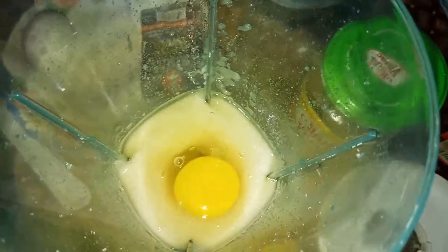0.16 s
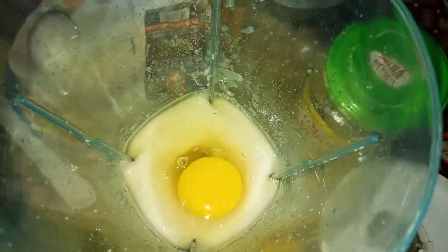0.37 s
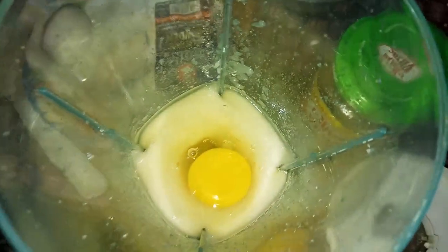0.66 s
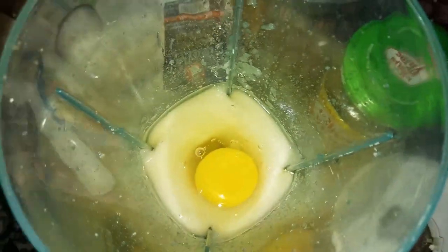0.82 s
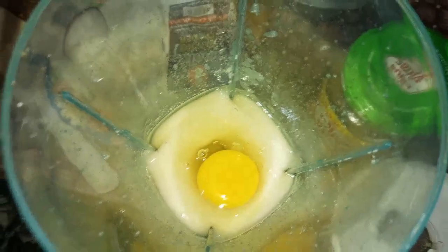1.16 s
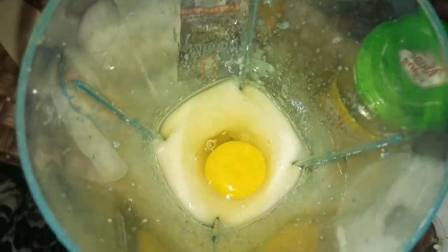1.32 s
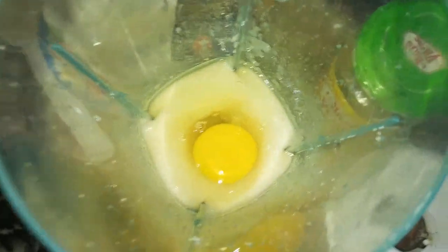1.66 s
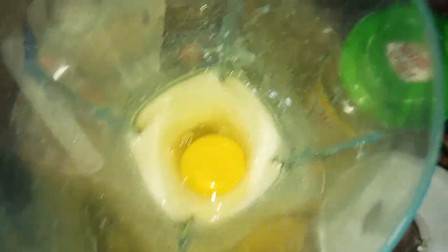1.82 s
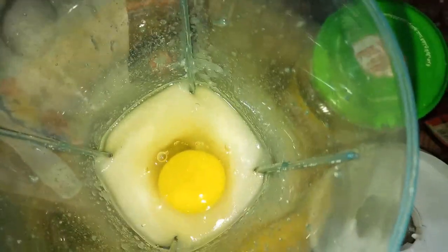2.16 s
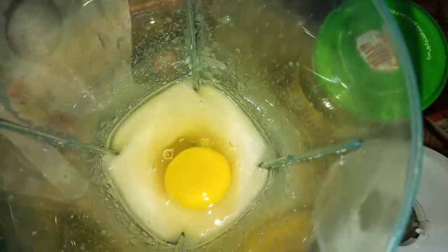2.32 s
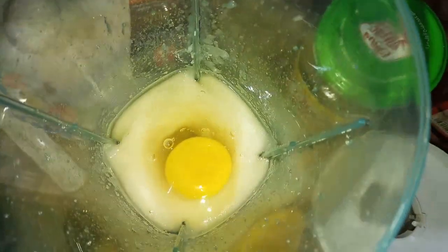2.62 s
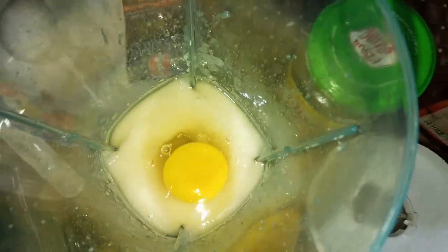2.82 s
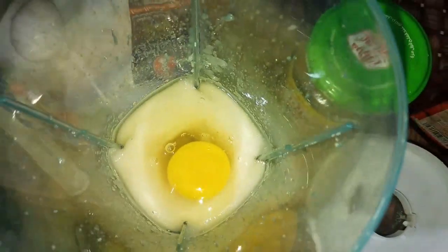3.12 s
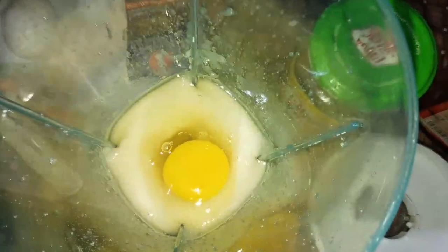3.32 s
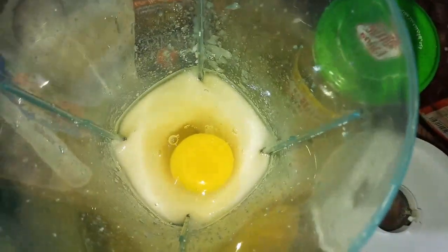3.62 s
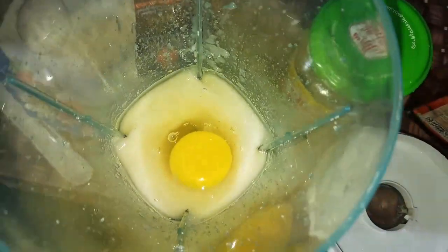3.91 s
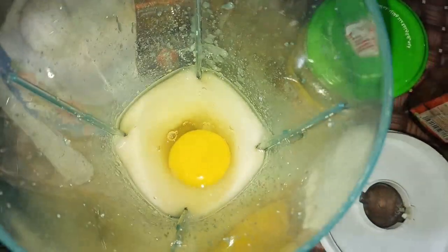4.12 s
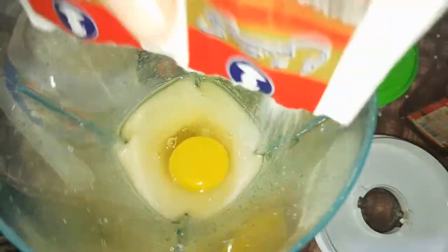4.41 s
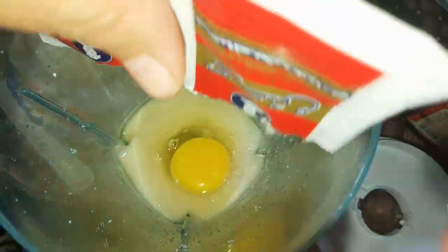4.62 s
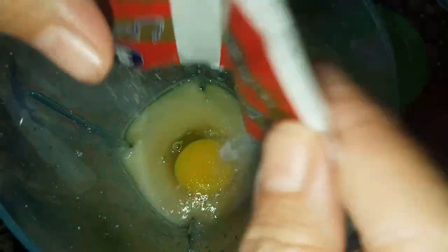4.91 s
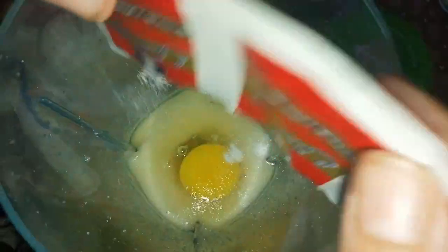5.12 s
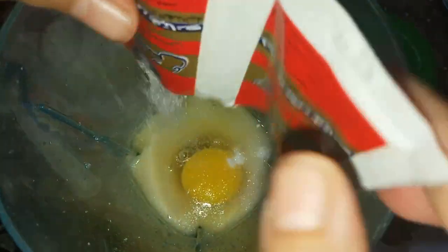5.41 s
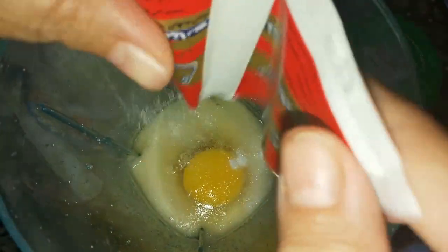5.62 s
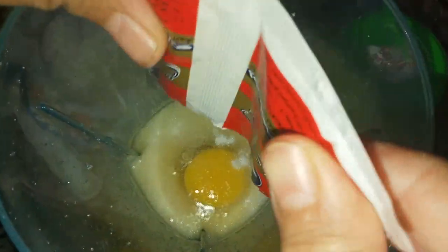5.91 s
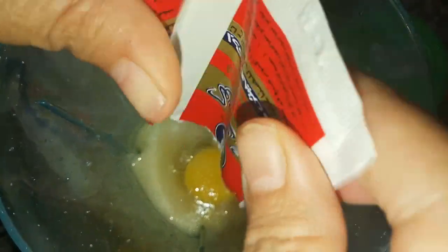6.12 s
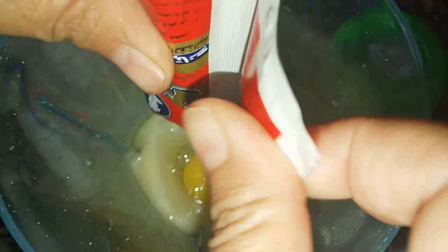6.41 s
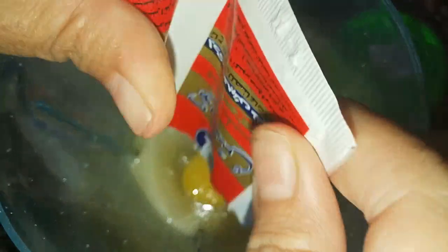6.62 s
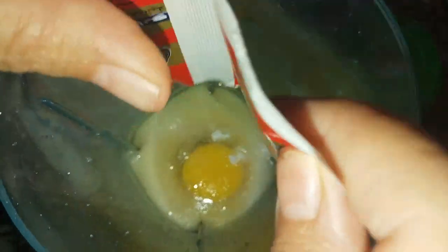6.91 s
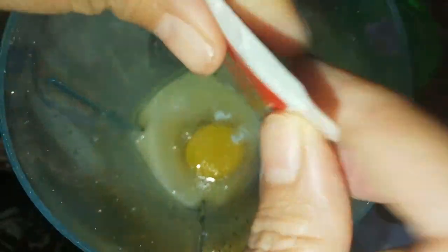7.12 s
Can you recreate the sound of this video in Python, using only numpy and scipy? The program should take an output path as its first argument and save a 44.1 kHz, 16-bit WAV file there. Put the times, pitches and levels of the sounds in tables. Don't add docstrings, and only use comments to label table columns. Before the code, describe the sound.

A small paper packet is torn and crinkled in sharp quick bursts, goes nearly quiet, then rustles densely over a bowl in a small kitchen.

```python
import sys
import numpy as np
from scipy import signal
from scipy.fft import rfft, irfft, next_fast_len
from scipy.io import wavfile
from scipy.ndimage import uniform_filter1d, map_coordinates

SR = 44100
rng = np.random.default_rng(int(sys.argv[2]) if len(sys.argv) > 2 else 0)


def file_out(sig):
    cols = np.atleast_2d(sig).T
    lim = np.clip(cols, -1, 1)
    pcm = np.round(lim * 32767).astype(np.int16)
    wavfile.write(sys.argv[1], SR, pcm)


def makeup_ratio(level_db):
    decades = np.asarray(level_db, float) / 20
    return 10 ** decades


N = 320166
T_S = np.arange(N) / SR

# (time [s], peak [dB], panel pitch [Hz], panel share [dB])
TEARING_CREASES = [(0.031, -17, 2650, -7), (0.105, -28, 2500, -17), (0.128, -19, 3360, -31),
                   (0.2776, -18.5, 3100, -5), (0.3319, -26.5, 1600, -1), (0.41, -45, 1900, 12),
                   (0.495, -22.5, 1920, -8), (0.537, -30, 1840, -3), (0.552, -35, 2120, -19),
                   (0.576, -26.5, 1850, 6), (0.735, -41.5, 2330, -5), (0.8076, -33, 2330, -12),
                   (0.893, -54.5, 2160, 16), (0.9299, -27.5, 1820, 0.5), (0.9749, -5.5, 3500, -22.5),
                   (1.0785, -22.5, 3330, -17), (1.126, -23, 2460, -11), (1.1562, -26, 2510, -6),
                   (1.3047, -43.5, 1650, -10), (1.6648, -41.5, 3070, -28), (1.7844, -36, 2380, -11),
                   (1.7949, -18, 3360, -44), (1.951, -28, 3400, -34), (1.972, -23, 2500, -13),
                   (2.0351, -22, 3120, -23.5), (2.0996, -25, 2760, -23), (2.1237, -31, 2860, -5.5),
                   (2.241, -28, 2880, -32), (2.4689, -24, 3230, -37), (1.927, -36, 1560, -23)]
# (time [s], peak [dB], panel pitch [Hz], panel share [dB])
HOLDING_CREASES = [(2.7515, -43.5, 2950, -3.5), (2.791, -39.5, 2650, -26), (2.8266, -42.5, 3350, -24),
                   (2.878, -62, 1550, 11), (2.929, -51, 2060, -7), (2.9414, -56, 3050, 15.5),
                   (3.128, -65, 2700, 10), (3.1695, -50, 2600, -19), (3.1873, -50, 2500, -25),
                   (3.3063, -50, 1730, -15), (3.6243, -48.5, 3400, -4), (3.8847, -52, 2500, 7.5),
                   (3.955, -55.5, 2000, 3), (4.028, -61, 1680, 15.5), (4.045, -61, 1870, 15.5),
                   (4.06, -70, 1590, 12), (4.092, -63, 1690, 21.5), (4.105, -65.5, 1620, 18.5),
                   (4.379, -36.5, 2720, -6), (4.42, -51, 2300, -2), (4.459, -25, 3300, -11),
                   (4.479, -32, 2140, -16), (2.7, -57, 3000, -36)]
# (time [s], peak [dB], panel pitch [Hz], panel share [dB])
SHAKING_CREASES = [(4.7198, -14, 2930, -4.5), (4.7452, -27, 3140, -13), (4.9264, -29.5, 2020, -15),
                   (4.9707, -32.5, 2830, 5), (5.0652, -30.5, 3200, -13), (5.1733, -21, 1990, -12.5),
                   (5.2299, -17.5, 2520, -3.5), (5.3193, -20, 2630, -8.5), (5.3745, -21, 1900, -8.5),
                   (5.403, -18, 2040, -7.5), (5.4288, -18.5, 1990, -6), (5.484, -28, 2645, -1.5),
                   (5.4992, -23.5, 2800, 2.5), (5.5605, -7, 3250, -9), (5.5764, -41, 3430, -1),
                   (5.6217, -21.5, 1800, -5), (5.6331, -13, 1960, -38), (5.678, -19, 1720, -10),
                   (5.7375, -20.5, 3400, -6), (5.756, -20, 2500, -3.5), (5.794, -19, 2960, -7),
                   (5.8102, -15, 3600, -4), (5.844, -22, 3150, -16), (5.865, -24.5, 2510, -18),
                   (5.8857, -10, 2980, -8.5), (5.969, -39, 2530, 3)]
# (time [s], peak [dB], panel pitch [Hz], panel share [dB])
SQUEEZING_CREASES = [(6.0167, -17.5, 2950, -29), (6.0375, -9.5, 2440, -28), (6.0446, -16.5, 1970, -5.5),
                     (6.054, -27, 2025, -29), (6.0696, -28, 3010, -1), (6.0786, -5, 3340, -13),
                     (6.1142, -12, 1750, -4.5), (6.1628, -11.5, 2170, -4.5), (6.216, -12.5, 3160, -10),
                     (6.24, -21, 2500, -9), (6.306, -15, 2550, -6), (6.325, -24, 2500, -7),
                     (6.3465, -19, 1580, -11), (6.3967, -23.5, 1920, -11), (6.468, -23.5, 3000, 2),
                     (6.477, -9.5, 3450, -9), (6.4873, -4, 3530, -8.5), (6.4975, -8, 3350, -42),
                     (6.634, -28, 3250, -10.5), (6.6767, -19.5, 3250, -9), (6.7157, -12, 1970, -11),
                     (6.761, -13.5, 3280, -13), (6.774, -10.5, 2840, -32), (6.837, -26.5, 2060, -2),
                     (6.842, -19.5, 2050, -18), (7.0495, -16, 3340, -18), (7.058, -17, 3300, -14),
                     (7.067, -13, 3430, 1), (7.104, -35, 2100, -18), (7.115, -29.5, 1560, -4.5),
                     (7.2356, -25, 3530, -2)]
# (time [s], level [dB])
AIR_PUFFS = [(.16, -38), (0.5762, -32.5), (0.9747, -49), (4.7455, -43.5), (4.9706, -46.5), (5.0614, -43),
             (5.174, -35.5), (5.2311, -34), (5.4018, -36.5), (5.4974, -29.5), (5.561, -49), (5.795, -42),
             (5.87, -37), (6.035, -29.5), (6.0794, -44), (6.14, -49), (6.218, -35), (6.5, -45),
             (6.7146, -55), (6.85, -29), (7.036, -28), (7.0491, -51), (7.063, -30), (7.105, -41.5)]
# (time [s], peak [dB], panel share [dB])
FIBRE_TICKS = [(0.1305, -13, -20), (0.1803, -19, -15.5), (0.2321, -32, -24), (0.3938, -39, -10),
               (0.4319, -41, -1), (0.5534, -24, -25), (0.581, -23.5, 1.5), (0.8604, -50, -22.5),
               (1.1267, -29.5, -5), (1.158, -23, -28), (1.4185, -15.5, -6), (1.6663, -43.5, -32),
               (1.7983, -26, -27), (1.9258, -33.5, -29), (1.9501, -30, -16), (1.9869, -28, -12.5),
               (2.0359, -17, -28), (2.0811, -30, -31), (2.0991, -33, -26), (2.1111, -26.5, -28),
               (2.1238, -27, -20), (2.1358, -30, -26), (2.1403, -29.5, -12), (2.1683, -37, -10),
               (2.2235, -33, -26), (2.2435, -35, -27), (2.3948, -21, -37), (2.4307, -16, -15.5),
               (2.5312, -34, -25), (2.6501, -56, -22), (2.702, -53, -22), (2.7668, -38.5, -11),
               (2.7929, -41, -23), (2.8286, -45, -17), (2.8432, -41, -12), (2.9344, -46, -11),
               (2.9439, -41.5, -14), (2.9675, -58, 2), (2.9809, -57, 5), (3.1292, -55, 2),
               (3.192, -44.5, -16.5), (3.1955, -41, -26), (3.2276, -47, -19), (3.2793, -52, -8),
               (3.3661, -55, -14), (3.6233, -49.5, -12.5), (3.8883, -50.5, -4), (3.9072, -52, -7),
               (3.9173, -59, -1), (4.0298, -59, -10), (4.0585, -61, -4), (4.0695, -61, 0),
               (4.3375, -25, -34), (4.3662, -28, -30), (4.4144, -39, -16),
               (4.5117, -33, -28), (4.576, -50, -24), (4.7201, -11.5, -19), (4.7457, -22, -16.5),
                  (4.755, -27, -9), (4.773, -39, -12), (4.8339, -32.5, -23), (4.9296, -25.5, -18),
                  (4.9736, -28, 0), (5.001, -38, -18), (5.0587, -37, -11), (5.0859, -26, -18),
                  (5.0998, -30, -22), (5.17, -24.5, -4.5), (5.1813, -26, 2), (5.1998, -31, -27),
                  (5.2584, -26.5, -5.5), (5.3203, -36, -15), (5.3575, -31.5, -9.5), (5.3781, -23, -6),
                  (5.4043, -18.5, -6), (5.4989, -19.5, -6.5), (5.563, -18.5, -26), (5.637, -6, -25),
                  (5.6755, -11.5, -13.5), (5.6794, -24, -19.5), (5.6855, -24, -19), (5.6941, -32, -25),
                  (5.7907, -20.5, -6), (5.8015, -21.5, -20.5), (5.8103, -14, -17), (5.871, -27, -21),
                  (5.8814, -22, -21), (6.0435, -19.5, -13), (6.0504, -11.5, -17), (6.0676, -22, -8),
                  (6.1665, -12, -22), (6.182, -17, -2.5), (6.2082, -16.5, -21), (6.2112, -10.5, -9),
                  (6.2396, -21, -23), (6.3067, -22, -19), (6.327, -22, -13.5), (6.3435, -24, -6.5),
                  (6.3472, -5.5, -22), (6.3569, -26, -30), (6.378, -26, -15), (6.4175, -27.5, 0.5),
                  (6.7062, -27, -8.5), (6.7277, -19, -13), (6.738, -24, -22), (6.7617, -8, -18),
                  (6.7772, -24.5, -20), (6.7843, -25, -18), (6.8198, -25, -28), (6.8445, -4.5, -14.5),
                  (7.0501, -12, -18), (7.1116, -25, -8), (7.226, -44, -16), (7.2365, -25.5, -4.5),
               (.0144, -37, -15), (.108, -22.5, -18), (.155, -16.5, -12), (0.263, -35, -12),
              (.4785, -23, -27), (0.97, -15.5, -10.5), (.98, -13, -17), (1.868, -36, -11.5),
              (2.026, -38, -14), (2.046, -25.5, -26), (5.5598, -22, -6.5), (5.576, -25, -15.5),
              (5.6205, -26, -3), (5.89, -18, -17), (6.0344, -13, -8.5), (6.082, -11, -15), (6.198, -24, -4),
              (6.221, -11, -17), (6.351, -21, -18), (6.722, -17, -9), (6.766, -17.5, -19), (7.044, -26, -8),
              (7.089, -23.5, -12), (7.102, -27.5, -10)]
# (peak time [s], peak [dB], swell [s], fade [s], sheet share [dB])
FREE_STROKES = [(.019, -34.5, 0.022, 0.14, -1), (.1, -35, 0.09, 0.17, -6.5), (0.139, -25, 0.021, 0.13, -9),
                (.32, -41.5, 0.18, 0.23, -6), (0.489, -45.5, 0.021, 0.46, -8),
                (0.604, -32, 0.17, 0.092, -6), (.82, -52.5, 0.2, 0.18, -7), (.9, -67, 0.013, .2, 20.5),
                (1.002, -30.5, 0.075, 0.12, -6.5), (1.25, -58.5, 0.49, 0.27, -5.5),
                (1.391, -23, 0.015, 0.17, -8), (1.432, -25, 0.043, 0.12, -5),
                (1.79, -39, 0.016, 0.29, -14.5), (1.97, -53, 0.32, 0.21, -11),
                (2.05, -35.5, 0.099, 0.29, -34.5), (2.14, -39.5, 0.15, 0.28, -20.5),
                (2.37, -44.5, 0.088, 0.12, -30), (2.402, -20.5, 0.028, .15, -31.5),
                (2.449, -28, 0.09, 0.096, -9.5), (2.77, -55.5, 0.055, 0.32, -9),
                (3.2, -67, 0.11, 0.37, -14), (4.05, -66.5, 0.51, 0.12, 3.5), (4.33, -38, 0.16, 1, -32),
                (4.46, -37.5, 0.46, 0.15, -25)]
# (peak time [s], peak [dB], swell [s], fade [s], sheet share [dB])
JAR_STROKES = [(4.729, -29.5, 0.035, 0.21, -12), (4.85, -40, 0.11, 0.28, -15.5),
               (4.93, -33, 0.061, 0.058, -15), (5.15, -37.5, 0.41, 0.76, -16), (5.4, -56, 0.62, 0.58, -13),
               (5.601, -36, 0.14, 0.39, -12), (5.8, -37.5, 0.17, 0.37, -4),
               (6.025, -29.5, 0.027, 0.44, -7.5), (6.217, -25, 0.081, 0.091, -6.5),
               (6.37, -41.5, 0.1, 0.25, -8.5), (6.507, -22, 0.058, 0.11, -10.5),
               (6.685, -44, 0.014, .12, -13), (6.726, -26.5, 0.053, 0.14, -9.5),
               (6.859, -38, 0.35, 0.11, -10), (7.059, -29, 0.049, 0.12, -9), (7.26, -53, 0.15, 0.17, 2.5)]
# (start [s], end [s])
SLIDE_S = (4.14, 4.71)
# (frequency [Hz], density [dB per Hz])
PAPER_COLOUR = [(1290, -37.5), (2200, -19.5), (3130, -9), (3390, -4), (3830, -5.5), (4190, -0.5), (6030, 4),
                (7670, -11.5), (8250, -26.5), (8390, -70.5), (10900, -74), (18500, -120)]
# (centre [Hz], width [Hz], level [dB])
PANEL_MODES = [(1578, 320, 0), (1962, 192, 7), (2500, 650, 3.5), (980, 1130, -5.5)]
# (centre [Hz], width [Hz], level [dB])
JAR_CROSS_MODES = [(1614, 125, 1.5), (2003, 85, 9), (2510, 570, 1.5), (3060, 94, 8.5), (911, 51, -11.5)]
# (centre [Hz], width [Hz], level [dB])
POUCH_AIR_MODES = [(820, 217, 0)]
# (centre [Hz], width [Hz], level [dB])
JAR_AIR_MODES = [(596, 105, 11), (400, 160, -1), (880, 150, -6)]
# (time [s], pitch [Hz], level [dB], t60 [s])
SINGLE_NOTES = [(1.95, 701, -53, 0.26), (2.765, 886, -65, 0.64), (2.971, 2540, -60, 0.13),
                (3.14, 2640, -65, 0.4), (3.889, 2545, -68, 0.24), (3.2, 1390, -78, 4.1),
                (4.17, 4950, -60, 0.44), (4.37, 517, -48.5, 0.029), (6.94, 5270, -51, 0.11),
                (4.56, 4300, -54, .4), (2.79, 5400, -62, .3), (2.83, 4200, -60, .3), (3.2, 5500, -64, .25),
                (4.412, 933, -56.5, 0.27), (5.625, 2003, -40.5, 0.24), (7.236, 2510, -29.5, 0.039),
                (7.238, 3310, -22.5, 0.031)]
# (frequency [Hz], t60 [s])
KITCHEN_T60 = [(500, 0.23), (3000, 0.13), (8000, 0.15)]
# (time [s], level [dB])
FOOTFALLS = [
    (.2, -57),
    (.48, -51),
    (1.619, -52.5),
    (1.92, -58.5),
    (2.6, -57.5),
    (3.32, -59),
    (3.47, -51.5),
    (5.979, -56),
    (6.4, -65),
]
# (frequency [Hz], density [dB per Hz])
ROOM_COLOUR = [(12, -56.5), (20, -22), (48, -24.5), (106, 0.5), (155, -13.5), (339, -16), (394, -23),
               (705, -20), (800, -26.5), (2560, -29.5), (2760, -30), (5740, -28), (7580, -40.5),
               (8390, -56), (10900, -87), (18500, -120)]
# (frequency [Hz], width [Hz], level [dB])
FRIDGE_LINES = [(102.4, 2.6, -59), (97.7, 2.7, -63), (51.5, 14, -77.5), (346, 20, -76), (168, 5, -77),
                (1390, 25, -86.5)]
# (time [s], half length [s], depth [0-1])
TREBLE_DIPS = [
    (1.765, .008, .5),
    (4.697, .006, .6),
    (7.013, .011, .9),
    (7.2, .02, .5),
]

OVER_JAR_S = 4.5
BUCKLE_MS, BUCKLE_SCATTER, QUICKER_PER_DB = 4, .2, .025
PUSH_DB, PUSH_FOLLOWS = -41, 0.61
PUFF_MS, TICK_MS = 4.5, 1.9
SWELL_CURVE, FADE_CURVE = 1.47, 1.21
AIR_FREE_DB, AIR_JAR_DB, AIR_FOLLOWS = -16, -12, 1
ROOM_DB, TOP_HZ = -69.5, 8025


def snaps():
    t = np.arange(SR // 16) / SR
    crack, ring, sheet, push = np.zeros((4, N + len(t)))
    for s, db, hz, panel_db in TEARING_CREASES + HOLDING_CREASES + SHAKING_CREASES + SQUEEZING_CREASES:
        scatter = BUCKLE_SCATTER * rng.standard_normal()
        steps = buckle(t, BUCKLE_MS * np.exp(scatter - QUICKER_PER_DB * (db + 22.5)))
        panel_ring = np.sin(2 * np.pi * hz * t) * makeup_ratio(-60 * t / .014)
        struck = signal.fftconvolve(steps, panel_ring)[:len(t)]
        first = round((s - .0004) * SR)
        at = slice(first, first + len(t))
        crack[at] += makeup_ratio(db - 7.0) * steps
        ring[at] += makeup_ratio(db + panel_db - 7.5) * struck / abs(struck).max()
        sheet[at] += makeup_ratio(db + panel_db - 12.5) * steps
        push[at] += makeup_ratio(db + PUSH_DB + PUSH_FOLLOWS * panel_db) * steps
    for s, db in AIR_PUFFS:
        push[round(s * SR):][:len(t)] += makeup_ratio(db - 3.5) * buckle(t, PUFF_MS)
    body = filtered(crack[:N], causal(PAPER_COLOUR)) + panels(sheet[:N])
    return patchy(body, depth_db=4.0, size=(3, 4)) + ring[:N] + hollow(push[:N])


def buckle(t, ms):
    u = t / (np.clip(ms, .5, 30) / 1000)
    envelope = (1 - np.exp(-u / .12)) * np.exp(-(u / 1.25) ** 1.3)
    steps = grains(len(t), rate=7000, spread_db=1.8, smooth=0.7) * envelope
    return steps / np.sqrt(abs(uniform_filter1d(steps ** 2, size=40)).max())


def ticks():
    u = np.arange(SR // 120) / SR / (TICK_MS / 1000)
    crack, sheet = np.zeros((2, N + len(u)))
    for s, db, panel_db in FIBRE_TICKS:
        burst = unit(rng.standard_normal(len(u)) * np.exp(-u)) / unit(np.exp(-u))[0]
        at = slice(round(s * SR), round(s * SR) + len(u))
        crack[at] += makeup_ratio(db - 7.5) * burst
        sheet[at] += makeup_ratio(db + panel_db - 3.0) * burst
    paper = filtered(crack[:N], causal(PAPER_COLOUR))
    return patchy(paper + panels(sheet[:N]), depth_db=4.0, size=(4, 3))


def rips():
    bright, full, low = effort()
    sliding = (T_S > SLIDE_S[0]) & (T_S < SLIDE_S[1])
    clump_db = np.where(sliding, .6, 1.7)
    clumps = makeup_ratio(clump_db * (0.72 * wobble(45) + wobble(220)))
    rip = clumps * grains(N, rate=6500, spread_db=1.7, smooth=.85)
    flap = unit(clumps * makeup_ratio(1.8 * wobble(30)) * grains(N, rate=4000, spread_db=1.5, smooth=.9))
    crisp = unit(filtered(rip, causal(PAPER_COLOUR)))
    taut = filtered(crisp, lambda hz: 1 / (1 + (2100 / (hz + 1)) ** 3))
    paper = makeup_ratio(-4.0) * bright * np.where(sliding, unit(taut), crisp)
    sheet = panels(makeup_ratio(-6.0) * full * flap)
    return patchy(paper + sheet, depth_db=3.5, size=(3, 10)) + hollow(makeup_ratio(0.1) * low * flap)


def effort():
    t, power = np.arange(0, N + 64, 32) / SR, 0
    for s, db, swell, fade, sheet_db in FREE_STROKES + JAR_STROKES:
        rise = (abs(s - t) / max(swell, .003)) ** SWELL_CURVE
        fall = (abs(t - s) / max(fade, .003)) ** FADE_CURVE
        shape_db = -30 * np.where(t < s, rise, fall)
        air_db = (AIR_JAR_DB if s > OVER_JAR_S else AIR_FREE_DB) + AIR_FOLLOWS * sheet_db
        shares_db = np.array([[0], [sheet_db], [air_db]])
        power = power + makeup_ratio(db + shape_db + shares_db) ** 2
    return [np.interp(T_S, t, gain) for gain in np.sqrt(power)]


def panels(push):
    return by_place(push, PANEL_MODES, JAR_CROSS_MODES)


def hollow(push):
    return patchy(by_place(push, POUCH_AIR_MODES, JAR_AIR_MODES), depth_db=2.5)


def by_place(push, free_modes, jar_modes):
    over = T_S > OVER_JAR_S
    return filtered(push * ~over, modes(free_modes)) + filtered(push * over, modes(jar_modes))


def notes():
    out, t = np.zeros(N + SR), np.arange(SR // 4) / SR
    drift = 1.1 * np.pad(wobble(130), (0, SR))
    for s, hz, db, t60 in SINGLE_NOTES:
        at = slice(round(s * SR), round(s * SR) + len(t))
        envelope = makeup_ratio(db - 60 * t / t60) * (1 - np.exp(-t / 0.00099))
        out[at] += envelope * np.sin(2 * np.pi * hz * t + drift[at])
    return out[:N] * makeup_ratio(4 * wobble(160))


def kitchen(x):
    out, hop = np.zeros(N + SR), SR // 4
    for start in range(0, N, hop):
        hz, t, z = signal.stft(rng.standard_normal(SR // 2), SR, nperseg=256)
        decay = makeup_ratio(-60 * t / along(KITCHEN_T60, hz)[:, None])
        tail = signal.istft(z * decay, SR, nperseg=256)[1]
        wet = signal.fftconvolve(x[start:start + hop], tail / np.linalg.norm(tail))
        out[start + 130:][:len(wet)] += wet
    return out[:N]


def bumps():
    swell = sum(makeup_ratio(db) * np.exp(-((T_S - s) / 0.042) ** 2) for s, db in FOOTFALLS)
    counter = modes([(54, 23, -2.6), (99.3, 12, -0.36)])
    return swell * filtered(rng.standard_normal(N), lambda hz: counter(hz) ** 2)


def background():
    tone = filtered(rng.standard_normal(N), lambda hz: makeup_ratio(along(ROOM_COLOUR, hz)))
    above = filtered(tone, lambda hz: 1. * (hz > 150))
    tone = makeup_ratio(ROOM_DB + 1.0) * makeup_ratio(.6 * wobble(3)) * tone / np.std(above)
    hum = 0
    for hz, width, db in FRIDGE_LINES:
        level = makeup_ratio(db + 0.5 + 0.4 * wobble(width))
        hum = hum + level * np.sin(2 * np.pi * hz * T_S + 0.2 * wobble(width))
    return patchy(tone, depth_db=1.8) + hum


def grains(size, rate, spread_db, smooth):
    hit = rng.random(size) < rate / SR
    strength = np.minimum(rng.exponential(1, size), 4)
    breaks = hit * rng.standard_normal(size) * makeup_ratio(spread_db * strength)
    return unit(unit(breaks) + smooth * rng.standard_normal(size))


def patchy(x, depth_db, size=(2, 6)):
    z = signal.stft(x, nperseg=384)[2]
    field = uniform_filter1d(rng.standard_normal(z.shape), size[0], 0)
    field = uniform_filter1d(field, size[1], 1)
    return signal.istft(z * makeup_ratio(depth_db * unit(field)), nperseg=384)[1][:N]


def modes(table):
    def response(f):
        total = 0
        for k, (c, w, db) in enumerate(table):
            total = total + (-1) ** k * makeup_ratio(db) * 1j * f * w / (c * c - f * f + 1j * f * w)
        return total
    return response


def causal(spectrum):
    def response(hz):
        cep = irfft(np.log(makeup_ratio(along(spectrum, hz)) + 1e-4))
        cep = cep * np.r_[1, 2 * np.ones(len(hz) - 1), np.zeros(len(cep) - len(hz))]
        return np.exp(rfft(cep))
    return response


def filtered(x, response):
    m = next_fast_len(N + SR // 2)
    gain = response(np.fft.rfftfreq(m, 1 / SR))
    return irfft(rfft(x, m) * gain / np.sqrt(np.mean(abs(gain) ** 2)), m)[:N]


def coloured(x, response):
    m = next_fast_len(N)
    return irfft(rfft(x, m) * response(np.fft.rfftfreq(m, 1 / SR)), m)[:N]


def wobble(rate):
    knots = rng.standard_normal(int(N * rate / SR) + 4)
    return map_coordinates(knots, [np.arange(N) * rate / SR])


def along(points, hz):
    f, v = np.transpose(points)
    return np.interp(np.log(hz + 1), np.log(f + 1), v)


def unit(x):
    return x / np.sqrt(np.mean(x ** 2) + 1e-20)


def scene():
    cracks, rubbing = snaps() + notes() + ticks(), rips()
    sachet = cracks + rubbing + kitchen(makeup_ratio(-6.0) * cracks + makeup_ratio(-12.5) * rubbing)
    thin = coloured(sachet, lambda hz: 1 / (1 + (280 / (hz + 1)) ** 4))
    return (thin + bumps() + background())[None]


def dip_treble(x):
    closed = sum(depth * np.exp(-((T_S - s) / half) ** 4) for s, half, depth in TREBLE_DIPS)
    treble = coloured(x, lambda hz: 1 / (1 + (1200 / (hz + 1)) ** 6))
    return x - closed * treble


def band_edge(hz):
    above_hz = hz - TOP_HZ
    return makeup_ratio(-45 * np.clip(above_hz / 250, 0, 1) - 60 * np.clip(above_hz / 4000, 0, 1))


def top_cut(x):
    return signal.sosfilt(signal.butter(12, 8540, fs=SR, output="sos"), x)


def record(dry):
    soft = dry[0] / (1 + abs(dry[0] / .5) ** 4) ** (1 / 4)
    kept = coloured(dip_treble(soft), band_edge)
    return top_cut(kept[None])


dry = scene()
out = record(dry)
file_out(out)
```